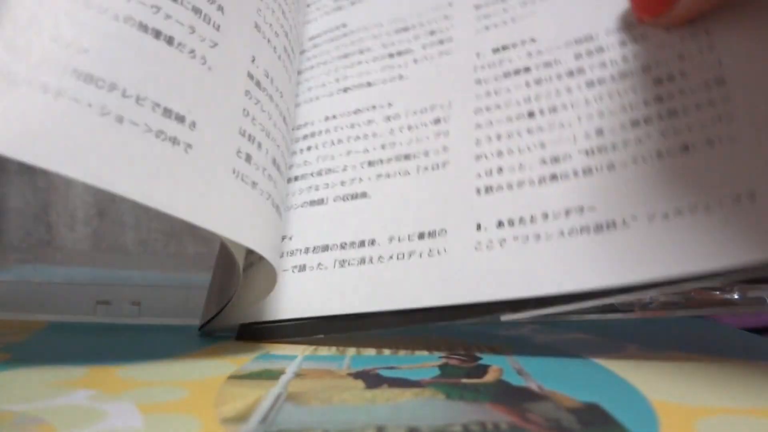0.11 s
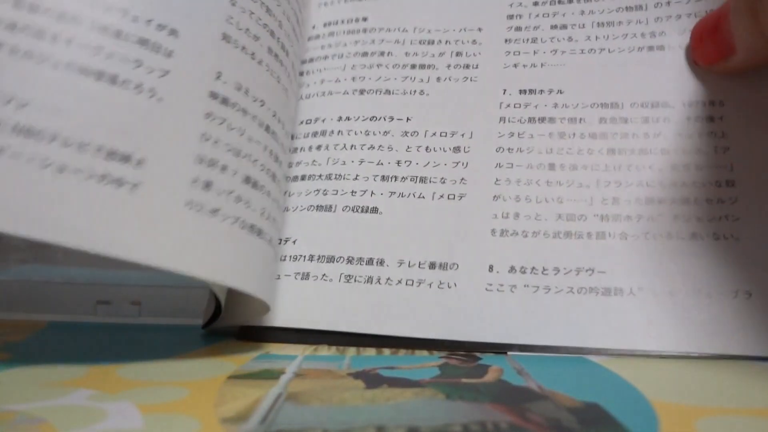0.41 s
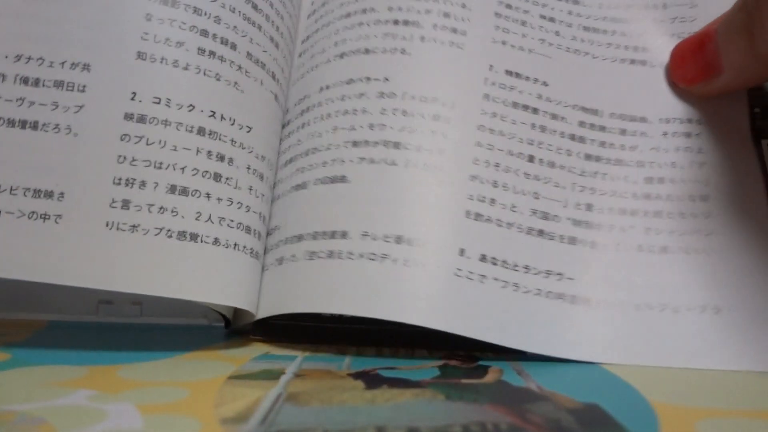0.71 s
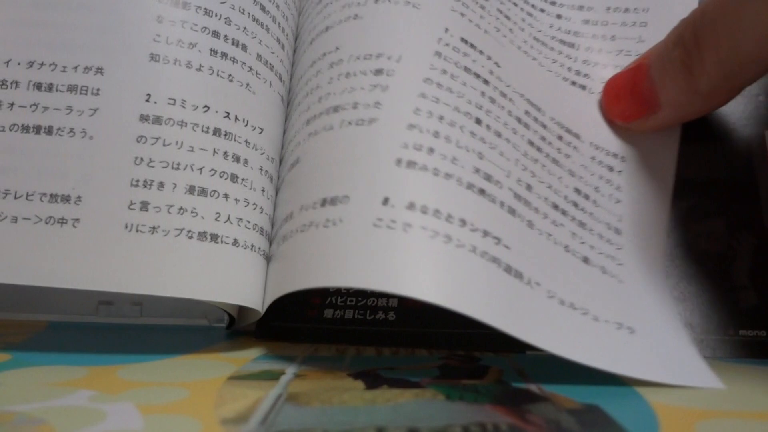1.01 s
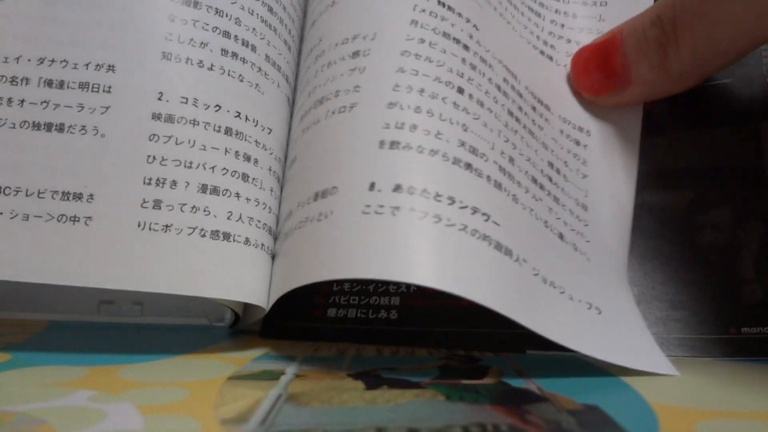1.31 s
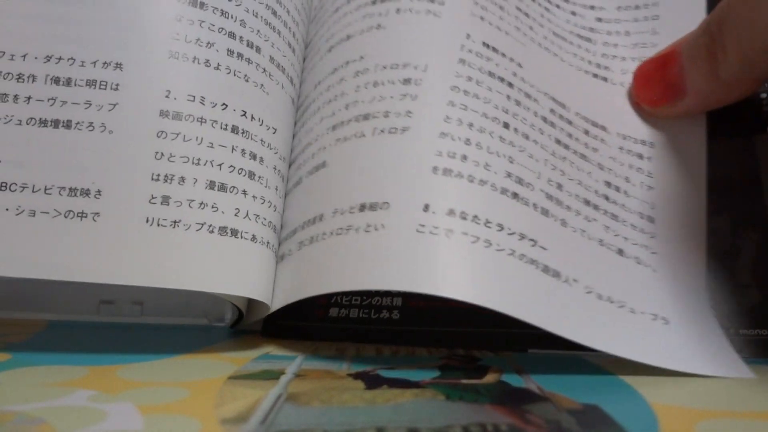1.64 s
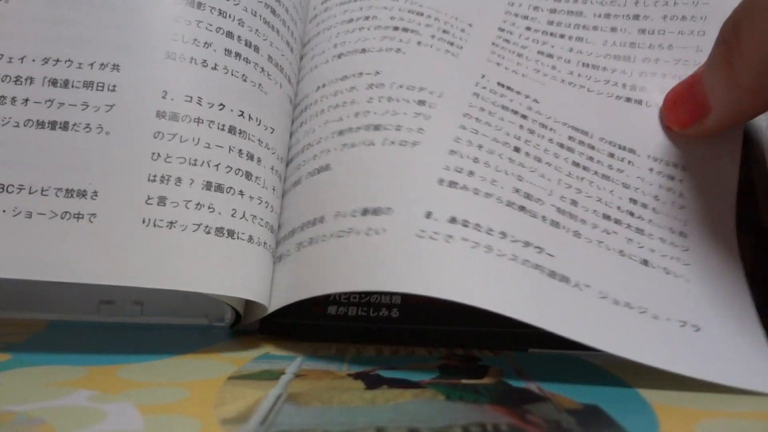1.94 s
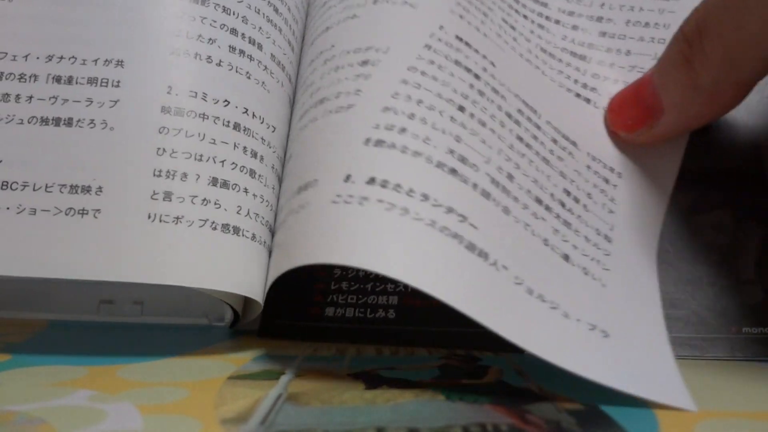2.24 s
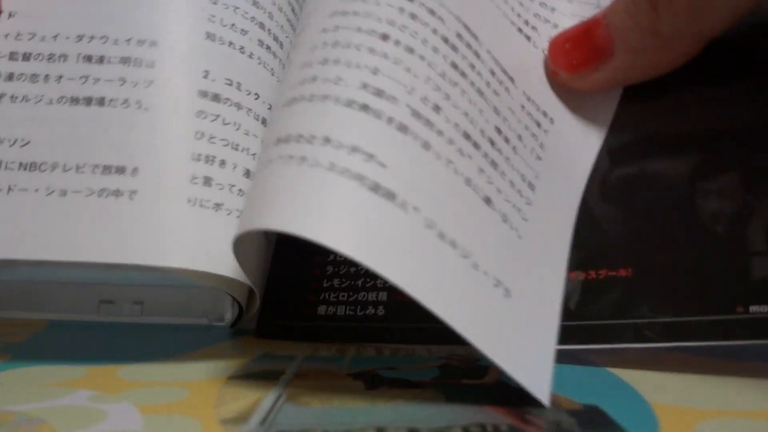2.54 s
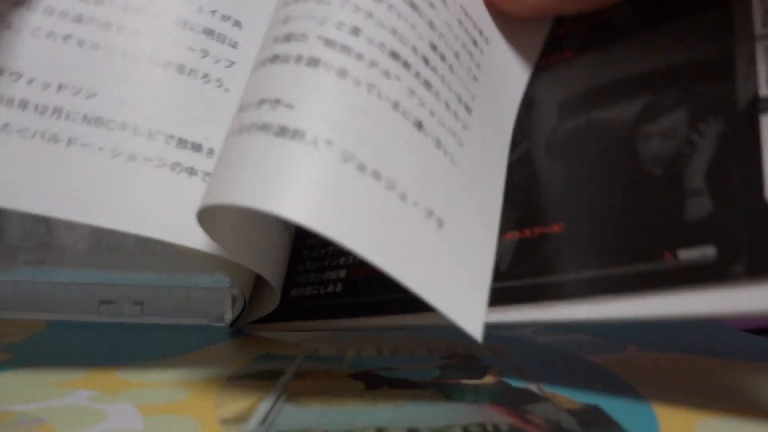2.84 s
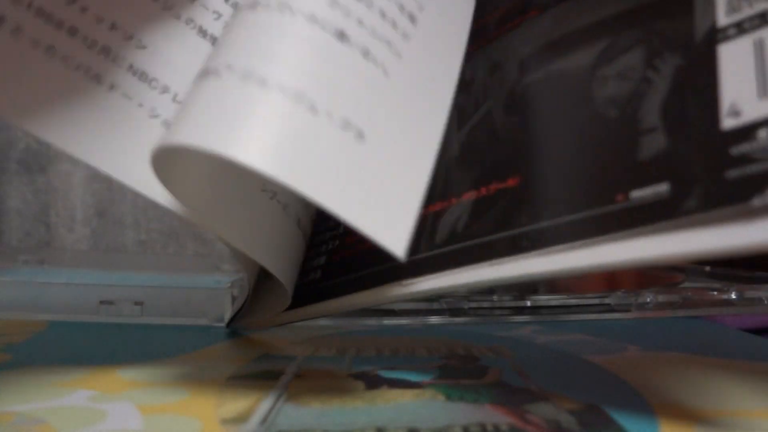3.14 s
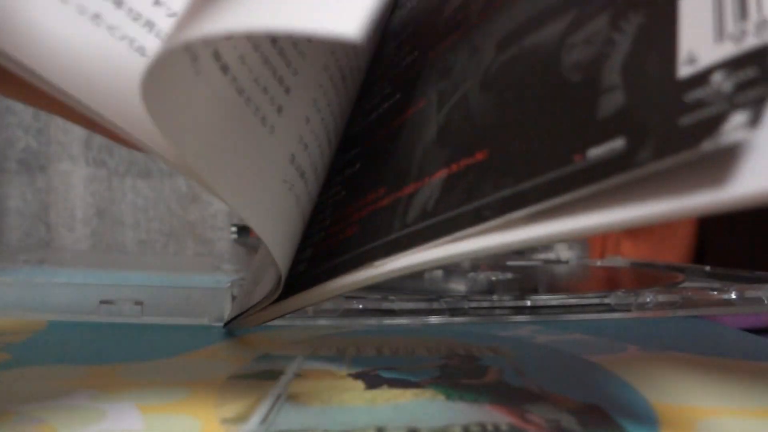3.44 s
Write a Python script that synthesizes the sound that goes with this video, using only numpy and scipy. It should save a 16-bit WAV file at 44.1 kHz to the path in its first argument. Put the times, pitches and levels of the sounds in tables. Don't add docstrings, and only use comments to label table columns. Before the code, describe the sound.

Close-miked page turning in a quiet room: light corner slips, a crackling start, swishing drags with a hollow papery tone, a brief lull, then brisk bright scrapes and a snap, with faint table thuds.

```python
import sys
import numpy as np
from scipy import signal
from scipy.fft import rfft, irfft
from scipy.io import wavfile

SR = 44100
rng = np.random.default_rng(int(sys.argv[2]) if len(sys.argv) > 2 else 0)


def elevation(decibels):
    levels = np.asarray(decibels, float)
    return 10 ** (levels / 20)


def unload_wav(signal):
    wavfile.write(
        sys.argv[1],
        SR,
        np.round(np.clip(np.atleast_2d(signal).T, -1, 1) * 32767).astype(np.int16),
    )


N = 158760
T = np.arange(N) / SR
HZ = np.fft.rfftfreq(N, 1 / SR) + 1

# time_s, friction_db, air_pocket_db (compared with the friction)
THUMB_STROKES = [
    [(.47, -42, -17), (.512, -48.5, -6), (.595, -48, 0), (.68, -42.5, 5.5), (.73, -36, 2), (.84, -34, 0),
     (.866, -38.5, 4), (1.0, -33.5, -2.5), (1.17, -36.5, -4)],
    [(1.195, -51, -3), (1.219, -41, -0.5), (1.32, -41, 0.5), (1.39, -42.5, 0), (1.435, -32.5, -2),
     (1.49, -35, -1), (1.65, -34, -5.5), (1.82, -35, -1.5), (1.93, -49, 5.5)],
    [(1.975, -41, -4), (2.125, -45, 2), (2.158, -37, -1), (2.224, -45.5, 2.5), (2.256, -38, -1.5),
     (2.33, -47, 3.5)],
    [(2.358, -36, 0), (2.452, -38.5, -0.5), (2.51, -53, 5.5), (2.535, -49, 3.5), (2.542, -44, 0),
     (2.588, -40, -0.5), (2.604, -57, 1.5), (2.72, -66, -8)],
]
# pitch_hz, level_db (per Hz)
DRAG_COLOUR = [(1350, -11), (2300, 0), (4020, 2), (4950, -0.5), (5620, 2), (6240, -2.5), (7090, -3),
               (10100, -5), (15500, -26)]
# pitch_hz, width_hz, boost_db (negative is a
POCKET_DIPS_AND_PEAK = [(2200, 157, -10), (3020, 74, -10), (3870, 130, -1), (6080, 720, -1.5), (7070, 590, 3.5),
                        (8030, 430, -2)]
# pitch_hz, width_hz, level_db
POCKET_TONES = [(1320, 226, 2), (1707, 480, 4.5), (1946, 370, -5), (2640, 170, -1.5), (994, 1030, -9)]
# time_s, delay_ms
TABLE_ECHO = [
    (.5, 0.67),
    (1.0, 0.73),
    (2.6, 0.754),
]
# start_s, length_s, level_db, rise_db (over the slip), air_pocket_db (compared with the slip)
CORNER_SLIPS = [(0.083, 0.04, -44, -4, -36), (.152, 0.018, -46.5, -3, -30), (0.204, 0.03, -39.5, 3, -35),
                (.228, .018, -46, -3, -30), (0.288, 0.077, -40, -6, -25), (0.358, 0.078, -39.5, 4.5, -21),
                (.43, 0.048, -38.5, 6, -18), (2.741, 0.073, -38, -5.5, -8.5), (2.806, 0.045, -32, 5, -12),
                (2.848, 0.048, -39.5, -2, -10), (2.877, .007, -35, -3, -20), (2.904, 0.046, -37, 6, -11),
                (2.949, 0.063, -36, 3.5, -11), (3.011, 0.075, -34, 0, -12.5), (3.074, .0135, -30, 15, -9),
                (3.091, .006, -40, -4, 0), (0.825, .011, -32, 1, -3), (0.837, 0.012, -34, -1, -4),
                (1.327, 0.039, -36, 7, -5), (3.406, 0.19, -54, 5, -7), (3.126, 0.021, -43, 2, -11),
                (3.146, 0.025, -44, 2, -5), (3.165, 0.025, -40, -7, -8), (3.201, 0.034, -50.5, 1, -3),
                (3.289, 0.039, -41, -6, -13), (3.325, .02, -50.5, -3, -8)]
# pitch_hz, level_db (per Hz)
SLIP_COLOUR = [(1500, -67), (2300, -7.5), (3100, -8.5), (4000, -2), (6500, -1), (9000, -3), (11400, -8.5),
               (15500, -22.5)]
# start_s, length_s, level_db, pitch_hz, width_hz
RUSTLE_SWELLS = [(-.03, 0.077, -58.5, 5230, 2000), (0.429, 0.077, -47, 790, 600),
                 (0.475, 0.033, -50, 3000, 1800), (0.53, 0.03, -49, 2400, 1800),
                 (0.572, 0.02, -42, 2200, 1400), (0.597, 0.018, -38, 2000, 1500),
                 (0.614, 0.007, -40, 1800, 1200), (0.619, 0.029, -36.5, 2300, 1600),
                 (0.645, 0.048, -41.5, 2500, 1400), (0.695, 0.15, -42, 2670, 1000),
                 (1.31, 0.6, -59.5, 582, 138.9), (2.291, 0.18, -39.5, 4400, 900),
                 (2.558, 0.22, -60, 1450, 400), (2.684, 0.085, -54, 6300, 2200),
                 (2.58, .15, -59, 8500, 3500), (.52, .12, -54, 800, 700), (3.13, .07, -54, 750, 500),
                 (2.59, .13, -61, 2800, 500), (.6, .09, -56, 600, 500), (1.03, .16, -42, 4000, 500),
                 (1.33, .04, -42, 5600, 500), (.43, .05, -48, 4200, 500), (.462, .018, -46, 8500, 2000),
                 (2.705, 0.054, -56, 1430, 400), (3.077, 0.016, -35.5, 1740, 500),
                 (3.075, .016, -38, 4100, 500), (3.07, 0.015, -38, 2380, 600), (3.002, .07, -41, 6700, 900),
                 (2.812, 0.05, -38, 6000, 1200), (3.207, 0.027, -51, 5130, 400),
                 (3.236, .16, -56, 3500, 600), (3.28, .04, -47, 5300, 800), (0.083, .035, -49, 4500, 1500),
                 (3.222, 0.18, -56.5, 1880, 700), (3.296, 0.032, -44, 1830, 463),
                 (3.405, 0.09, -55, 5600, 1800), (3.49, .12, -54, 5160, 1500)]
# start_s, peak_db, pitch_hz, spread_s (time over which the contacts scatter)
PAPER_TICKS = [(.4442, -21.5, 1360, 0.0055), (.459, -33, 890, 0.0089), (.475, -30.5, 1250, 0.00435),
               (.558, -33.5, 650, 0.00483), (.4655, -36, 1000, .003), (2.997, -30, 5000, .002),
               (2.417, -32, 7000, .002), (2.538, -40, 6500, .002), (.8303, -17, 1700, 0.003),
               (.843, -23.5, 1800, .002), (3.0915, -31, 1800, 0.00206), (.2885, -43, 1500, .002),
               (0.23, -44.5, 950, .002), (3.412, -46, 1400, .002), (3.429, -47, 1100, .002),
               (3.462, -45, 1400, .003), (3.287, -43, 920, 0.0031), (2.816, -25.5, 1170, 0.002),
               (3.0858, -17.5, 3950, .002), (3.136, -41, 1700, 0.0051), (3.167, -31, 2200, .003)]
# start_s, length_s, level_db, pitch_hz
TABLE_THUDS = [(0.141, 0.11, -54.5, 85), (0.228, 0.028, -53, 120), (0.286, .07, -61.5, 90),
               (0.405, 0.12, -51, 150), (1.42, .05, -62, 140), (0.686, 0.12, -71, 102),
               (1.278, 0.15, -65.5, 80), (1.484, 0.055, -52, 111.1), (2, 0.055, -76, 110),
               (2.792, 0.047, -64, 110), (2.848, 0.036, -56, 102), (3.474, 0.042, -68, 80)]
# pitch_hz, side_db (compared with the middle)
PAPER_WIDTH = [(500, -11), (1500, -13), (4000, -15.5), (12000, -21)]
# pitch_hz, level_db (per Hz)
ROOM_COLOUR = [(20, -19), (70, -4.5), (200, -9.5), (1200, -3), (3500, -14), (5700, -4), (11000, -12.5),
               (15500, -27)]


def rms_one(x):
    return x / np.sqrt(np.mean(x ** 2) + 1e-20)


def at_hz(points):
    hz, db = np.transpose(points)
    return np.interp(np.log(HZ), np.log(hz), db)


def drift(rate):
    r = np.exp(-80 * np.pi * rate / SR)
    noise = rng.standard_normal(N // 40 + 2002)
    slow = signal.lfilter([1], [1, -2 * r, r * r], noise)[2000:]
    return np.interp(np.arange(N) / 40, np.arange(len(slow)), rms_one(slow))


def resonate(x, hz, width_hz):
    r = np.exp(-np.pi * width_hz / SR)
    top = np.array([1, 0, -1]) * (1 - r * r) / 2
    return signal.lfilter(top, [1, -2 * r * np.cos(2 * np.pi * hz / SR), r * r], x + 1e-18)


def both_sides(side):
    return side * [[1], [-1]]


def friction(flutter_db):
    grains_per_s, grain_spread_db, grain_db = 5000, 3, -8
    sizes = elevation(grain_spread_db * np.minimum(rng.exponential(1, N), 3)) * rng.choice([-1, 1], N)
    grains = rms_one(sizes * (rng.random(N) < grains_per_s / SR))
    flutter = elevation(flutter_db * (drift(13.6) + 1.8 * drift(53)))
    return (rng.standard_normal(N) + elevation(grain_db) * grains) * flutter


def patchy(x, colour_db, patchy_db, lift_db=0):
    spectrum = rfft(x) * elevation(colour_db)
    total = np.zeros(N)
    for hz in np.arange(1200, 16300, 600):
        strip = np.cos(np.pi / 2 * np.clip((HZ - hz) / 600, -1, 1)) ** 2
        swell = elevation(patchy_db * drift(7) + lift_db * hz / 10000)
        total += irfft(spectrum * strip, N) * swell
    return rms_one(total)


def pocket(x):
    tones = np.zeros(N)
    for k, (hz, width_hz, db) in enumerate(POCKET_TONES):
        ring = resonate(resonate(x, hz, width_hz), hz, width_hz)
        tones += (-1) ** k * elevation(db + 1.7 * drift(5)) * ring
    return rms_one(signal.sosfilt(signal.butter(2, 600, "high", fs=SR, output="sos"), tones))


def drag():
    s, db, pocket_db = np.concatenate(THUMB_STROKES).T
    force_db = np.interp(T, s, db)
    fade_in = np.clip((T - s[0]) / 0.025, 0, 1)
    fade_out = np.clip((s[-1] - T) / 0.043, 0, 1)
    rub = friction(flutter_db=0.36)
    lag = np.interp(T, *np.transpose(TABLE_ECHO)) / 1000 * (1 + 0.035 * drift(2.7))
    echoed = rub + sum(0.24 ** k * np.interp(T - k * lag, T, rub) for k in range(1, 4))
    dips_and_peak = sum(boost / (1 + (2 * (HZ - hz) / w) ** 2) for hz, w, boost in POCKET_DIPS_AND_PEAK)
    brighter_db = 0.23 * (force_db + 33.5)
    hiss = patchy(echoed, at_hz(DRAG_COLOUR) + dips_and_peak, patchy_db=1.8, lift_db=brighter_db)
    hollow = elevation(np.interp(T, s, pocket_db)) * pocket(rub)
    return elevation(force_db) * fade_in * fade_out * (hiss + hollow)


def slips():
    attack_s, release_s, arch_db = 0.0055, 0.0028, 6
    bright, low = np.zeros(N), np.zeros(N)
    for s, length, db, rise_db, pocket_db in CORNER_SLIPS:
        u = np.clip((T - s) / length, 0, 1)
        start = np.clip((T - s) / attack_s, 0, 1)
        stop = np.exp(-np.maximum(T - s - length, 0) / release_s)
        stroke = start * stop * elevation(db + rise_db * (u - .5) - arch_db * (2 * u - 1) ** 2)
        bright = np.hypot(bright, stroke)
        low = np.hypot(low, stroke * elevation(pocket_db))
    rub = friction(flutter_db=0.74)
    return bright * patchy(rub, at_hz(SLIP_COLOUR), patchy_db=2.5) + low * pocket(rub)


def rustle_swells():
    out, rub = np.zeros(N), friction(flutter_db=-0.5)
    for s, length, db, hz, width_hz in RUSTLE_SWELLS:
        span = (T > s) & (T < s + length)
        swell = np.sin(np.pi * (T[span] - s) / length)
        ring = resonate(resonate(rub[span], hz, width_hz), hz, width_hz)
        out[span] += elevation(db) * swell * rms_one(ring)
    return out


def ticks():
    tones = [(0.84, 0, 0.97), (0.45, -7, -0.67), (1.23, 0.5, -1.17), (2.1, -3, 1.5)]
    out, luck = np.zeros(N), rng.random((len(PAPER_TICKS), 8))
    for (s, db, hz, spread), u in zip(PAPER_TICKS, luck):
        clicks = np.zeros(2000)
        clicks[0] = 1
        clicks[5 + (u[:4] * spread * SR).astype(int)] = 0.95 * (u[4:] - .5)
        snap = np.zeros(2000)
        for ratio, tone_db, strength in tones:
            ring = resonate(clicks, hz * ratio, hz * ratio / 3.0)
            snap += elevation(tone_db) * ring * strength / ratio
        i = int(s * SR)
        out[i:i + 2000] += elevation(db) * snap / np.abs(snap).max()
    return out


def thuds():
    out, white = np.zeros((2, N)), rng.standard_normal((2, N))
    for s, length, db, hz in TABLE_THUDS:
        i, n = int(s * SR), int(length * SR)
        band = signal.butter(3, [hz / 1.9, hz * 1.62], "band", fs=SR, output="sos")
        low = signal.sosfilt(band, white[:, i - 4000:i + n])[:, 4000:]
        mid, side = rms_one(low) * np.hanning(n)
        out[:, i:i + n] += elevation(db) * (mid + elevation(-7) * both_sides(side))
    return out


def space(x):
    t = T[:SR // 4]
    tail = rng.standard_normal(len(t)) * elevation(-60 * t / 0.14) * (t > .003)
    echo = signal.fftconvolve(x, tail / np.sqrt(np.sum(tail ** 2)))[:N]
    side = irfft(rfft(x * drift(40)) * elevation(at_hz(PAPER_WIDTH)), N)
    return x + elevation(-21) * echo + both_sides(side)


def room():
    tone = rms_one(irfft(rfft(rng.standard_normal((2, N))) * elevation(at_hz(ROOM_COLOUR)), N))
    bass = signal.sosfilt(signal.butter(2, 130, fs=SR, output="sos"), tone)
    mid, side = tone + bass * (elevation(1.25 * drift(16)) - 1)
    side_colour = [(40, -14), (150, -3.5), (400, 2), (3000, -1), (12000, -12.5)]  # pitch_hz, level_db
    side = irfft(rfft(side) * elevation(at_hz(side_colour)), N)
    hum = elevation(-73.5) * np.sin(2 * np.pi * 400 * T)
    return elevation(-56) * (mid + elevation(-2) * both_sides(side)) + hum


def scene():
    paper = drag() + slips() + rustle_swells() + ticks()
    return space(paper) + thuds() + room()


def top_cut(x):
    return signal.sosfilt(signal.butter(12, 15760, fs=SR, output="sos"), x)


def record(dry):
    cut = signal.cheby2(20, 60, 15880, fs=SR, output="sos")
    mix = signal.sosfilt(cut, dry)
    return top_cut(mix)


dry = scene()
out = record(dry)
unload_wav(out)
```